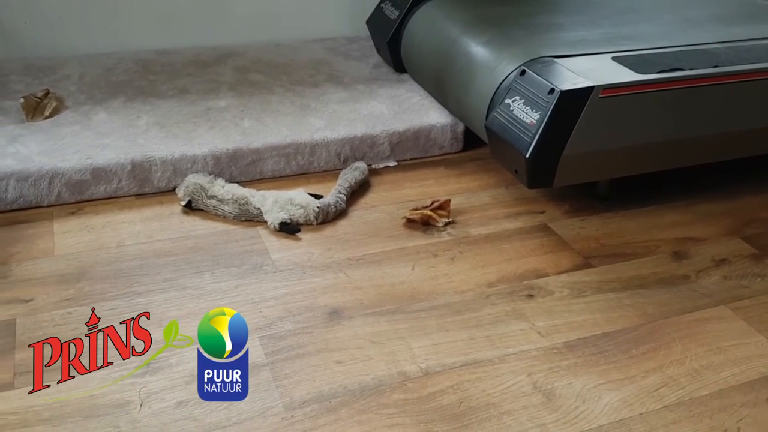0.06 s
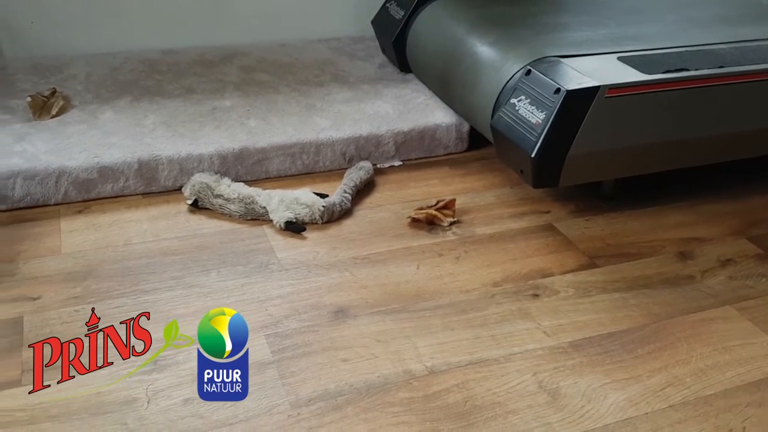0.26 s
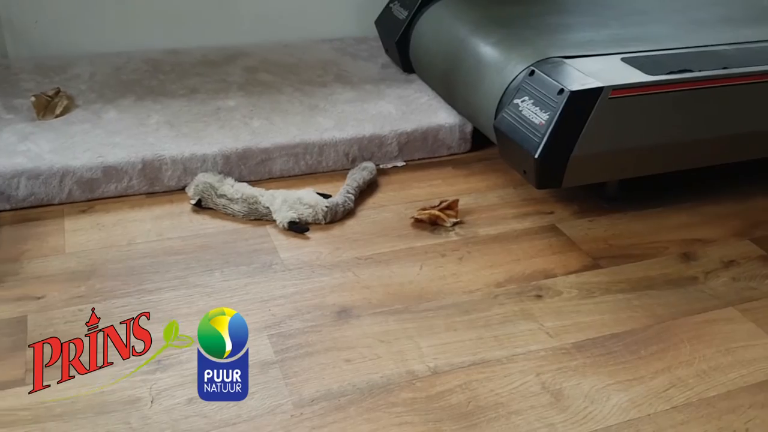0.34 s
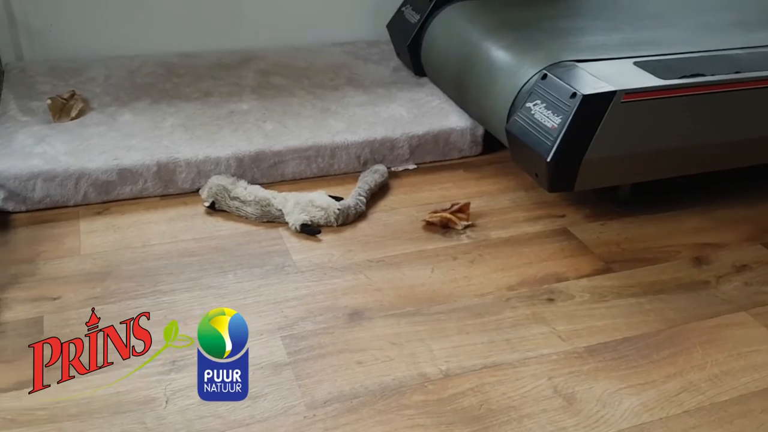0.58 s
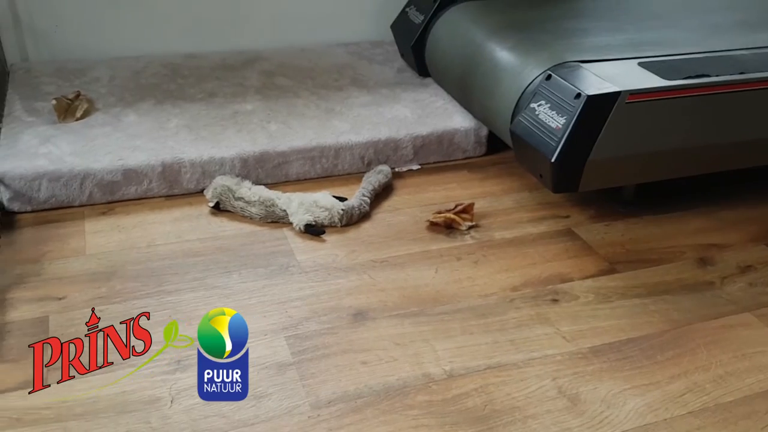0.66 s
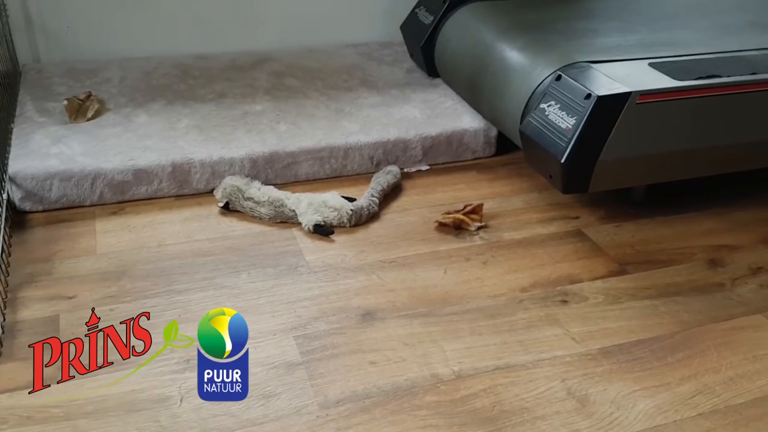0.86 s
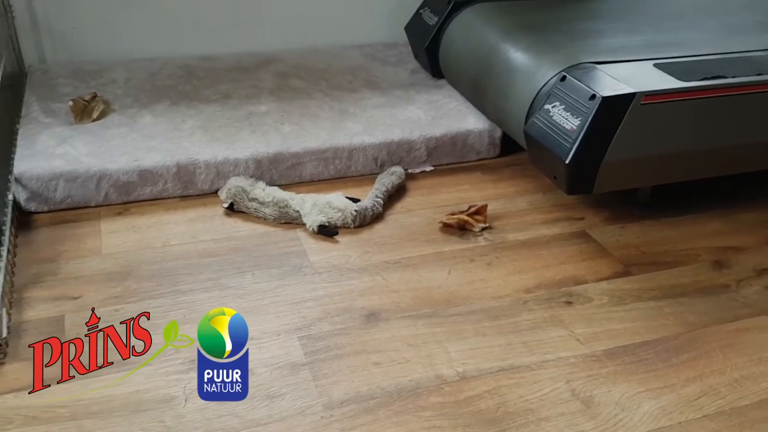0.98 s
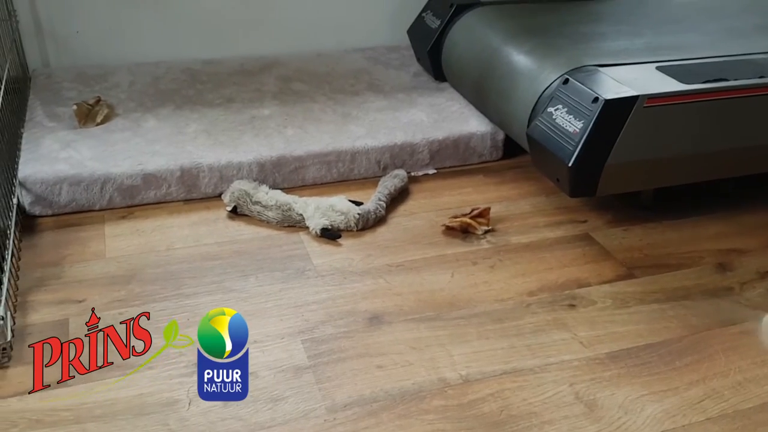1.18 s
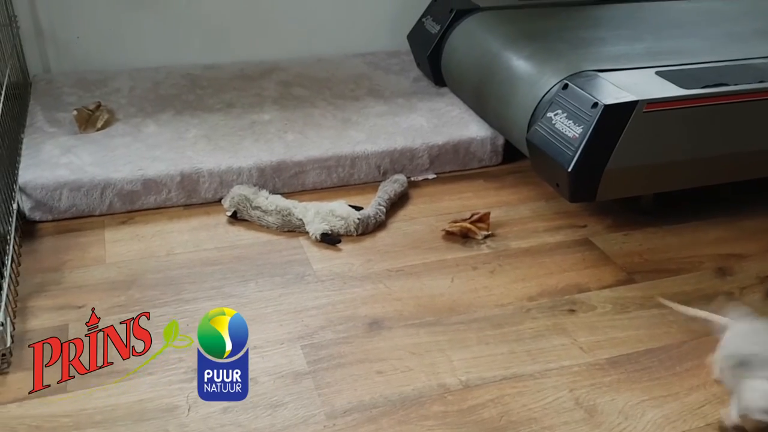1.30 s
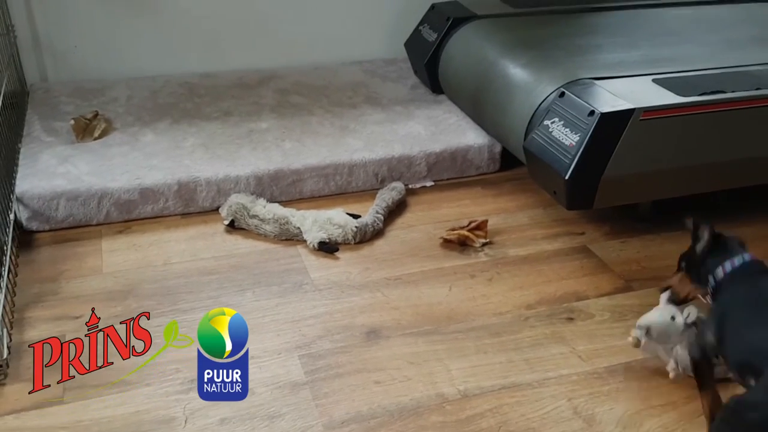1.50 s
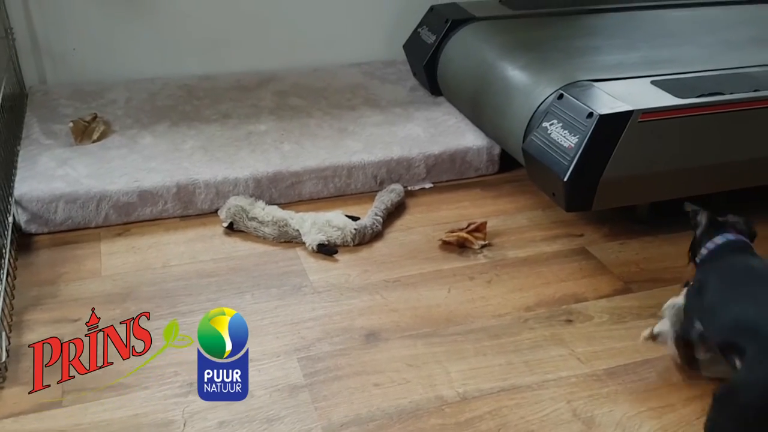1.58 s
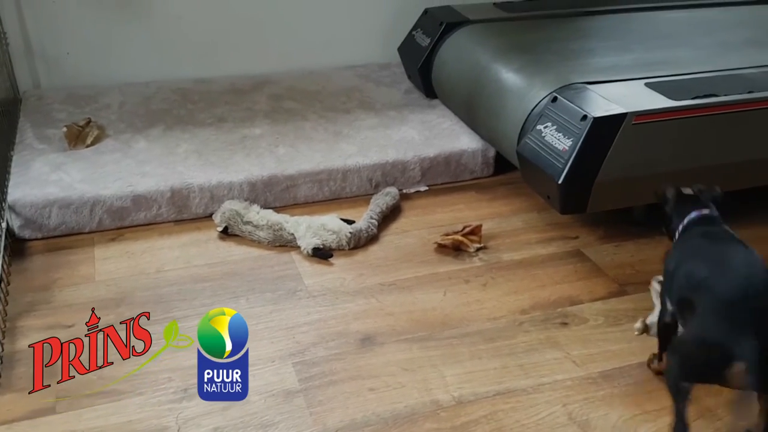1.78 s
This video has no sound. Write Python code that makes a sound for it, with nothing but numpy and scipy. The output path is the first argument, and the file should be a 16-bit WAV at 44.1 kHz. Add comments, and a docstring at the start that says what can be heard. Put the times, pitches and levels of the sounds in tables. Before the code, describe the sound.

A small dog trots over a laminate floor, its claws ticking unevenly with soft paw thumps and short scuffs. Something hard knocks hollowly on the boards, loudest at about 0.45 seconds and again around 0.7. Dull, close taps follow between 0.8 and 1.5 seconds. The steps thin out, with a last faint tick near 1.8. The room rings slightly, over a steady low hum, rumble and hiss.

```python
"""A small dog trots into a room over a laminate floor. Its pads thump the boards; its claws tick,
ring the floor's thin top layer and scuff in short drags. Something hard meets the boards in a few
hollow knocks, and dull taps sound close by. The room rings on after each; rumble, microphone hiss
and a low machine hum stay under it all."""
import sys
import numpy as np
from scipy import signal
from scipy.fft import rfft, irfft, next_fast_len
from scipy.io import wavfile
from scipy.ndimage import uniform_filter1d

SR = 44100
rng = np.random.default_rng(int(sys.argv[2]) if len(sys.argv) > 2 else 0)


def log_audio(samples):
    """Write samples as a 16-bit WAV file to the path given in sys.argv[1]."""
    # one column per channel
    frames = np.atleast_2d(samples).T
    # limit to full scale, then quantise
    limited = np.clip(frames, -1, 1)
    pcm = np.round(limited * 32767).astype(np.int16)
    wavfile.write(sys.argv[1], SR, pcm)


N = 81585
FFT_SIZE = next_fast_len(N + 4096)


def amp(db):
    return 10 ** (np.asarray(db) / 20)


def unit_rms(x):
    return x / np.sqrt(np.mean(x ** 2) + 1e-20)


def unit_peak(x):
    return x / np.abs(x).max()


def curve_at(points, hz):
    freqs_hz, values = np.transpose(points)
    return np.interp(np.log(hz + 1), np.log(freqs_hz + 1), values)


def place(mix, start_s, sound, pan_db):
    """Add a sound to the mix; pan_db is left over right."""
    part = mix[:, round(start_s * SR):][:, :sound.shape[-1]]
    part += amp([[pan_db / 2], [-pan_db / 2]]) * sound[..., :part.shape[1]]


def delay_left(x, lag_s):
    """Delay left against right."""
    shift = np.exp(-1j * np.pi * lag_s * np.fft.rfftfreq(FFT_SIZE, 1 / SR))
    return irfft(rfft(x, FFT_SIZE) * np.array([shift, 1 / shift]), FFT_SIZE)[:, :N]


def resonate(x, hz, width_hz):
    return signal.lfilter(*signal.iirpeak(hz, hz / width_hz, SR), x)


def resonate_twice(x, hz, width_hz):
    return resonate(resonate(x, hz, width_hz), hz, 2 * width_hz)


def treble(x, low_hz=8100, top_hz=11900):
    x = signal.sosfilt(signal.butter(3, low_hz, "high", fs=SR, output="sos"), x)
    return signal.lfilter(*signal.butter(2, top_hz, fs=SR), x)


def ring(modes, t, phases, centre_hz, width_hz):
    """Decaying modes, weighted toward the centre frequency of the blow."""
    out = np.zeros(len(t))
    for (hz, level_db, t60_s), phase in zip(modes, phases):
        weight = 1 / (1 + ((hz - centre_hz) / width_hz) ** 2)
        out += weight * amp(level_db - 60 * t / t60_s) * np.sin(2 * np.pi * hz * t + phase)
    return out


def wander(low_hz, top_hz):
    """Slow random motion, rms 1."""
    t = np.arange(N) / SR
    rates_hz = np.geomspace(low_hz, top_hz, 20)
    return unit_rms(sum(np.sin(2 * np.pi * (hz * t + rng.random())) / np.sqrt(hz) for hz in rates_hz))


# Left-right likeness of the room's sound: freq_hz, correlation
STEREO_CORRELATION = [(60, 0.91), (150, 0.92), (380, 0.87), (950, 0.13), (2380, -0.21), (5980, 0.0046),
                      (15000, -0.2)]


def stereo_noise(shape_db, frames, frame_size):
    """Two partly correlated noises with the given short-time spectrum."""
    hz = np.fft.rfftfreq(frame_size, 1 / SR)
    a, b, c, d = rng.standard_normal((frames, len(hz), 4)).T
    left, independent = a + 1j * b, c + 1j * d
    correlation = curve_at(STEREO_CORRELATION, hz)[:, None]
    right = correlation * left + np.sqrt(1 - correlation ** 2) * independent
    spectra = np.array([left, right]) * amp(shape_db)
    return signal.istft(spectra, nperseg=frame_size, noverlap=frame_size * 3 // 4)[1]


# Background noise spectrum: freq_hz, relative_db
AIR_SPECTRUM = [(12, -37), (20, -30), (104, -7.5), (141, -10.5), (317, -14.5), (345, -20), (483, -18.5),
                (638, -22.5), (776, -24), (1360, -27.5), (1520, -22), (1650, -27.5), (2510, -26),
                (2730, -26.5), (6660, -42), (13400, -40), (15800, -38.5)]


def air(level_db=-58.5, swell_db=0.1):
    """Near-steady room rumble and microphone hiss."""
    shape_db = curve_at(AIR_SPECTRUM, np.fft.rfftfreq(2048, 1 / SR))[:, None]
    noise = stereo_noise(shape_db, frames=N // 512 + 5, frame_size=2048)[:, :N]
    return amp(level_db - swell_db * wander(0.57, 5.45)) * unit_rms(noise)


# Machine tones: pitch_hz, rms_db
HUM_TONES = [(31, -73), (90, -61), (150, -65)]


def hum(waver_db=1.5, drift_hz=1.5):
    """Low tones of a machine, wavering in level and pitch."""
    out = np.zeros(N)
    for pitch_hz, rms_db in HUM_TONES:
        gain = np.sqrt(2) * amp(rms_db + waver_db * wander(3.495, 8.6))
        hz = pitch_hz + drift_hz * wander(1.43, 11.85)
        out += gain * np.sin(2 * np.pi * np.cumsum(hz) / SR)
    return out


# Floor board modes: pitch_hz, level_db, t60_s
BOARD_MODES = [(84.8, -3, 0.12), (137, -26, 0.059), (175, -1, 0.1), (220.6, -0.5, 0.083),
               (365, -2.5, 0.077), (487, 0.5, 0.057)]


def pad_thump(t, centre_hz, rise_s=0.0053):
    """A soft pad sets the boards' low modes ringing."""
    phases = rng.uniform(-0.52, 1, len(BOARD_MODES))
    onset = np.sin(np.pi / 2 * np.minimum(t / rise_s, 1)) ** 2
    return unit_peak(ring(BOARD_MODES, t, phases, centre_hz, width_hz=116) * onset)


def claw_tick(t, noise, pitch_hz, rise_s=0.00066, decay_s=0.0034):
    """A claw lands in a cluster of ticks; the floor's thin top layer rings under it."""
    cluster = noise * np.abs(noise) * np.minimum(t / rise_s, 1) * np.exp(-t / decay_s)
    ticks = 3.0 * (t == 0) + cluster
    body = unit_peak(resonate_twice(ticks, pitch_hz, width_hz=950))
    edge = unit_peak(resonate(resonate(ticks, hz=3000, width_hz=2330), hz=4960, width_hz=3300))
    top_layer = unit_peak(resonate(ticks, hz=2450, width_hz=440))
    return unit_peak(body + amp(-3) * edge + amp(-4) * top_layer)


# Paw falls: start_s, claw_hz, thump_hz, thump_db, board_db, claw_db, scratch_db, pan_db
PAW_FALLS = [(.035, 3060, 202, -66, -58, -51.5, -57, -4), (0.164, 2780, 300, -59, -56.5, -50.5, -65, -5),
             (.234, 2350, 197, -50.5, -51, -39, -54, 1.5), (.241, 2420, 202, -64, -52, -40, -55, -7),
             (.351, 2360, 178, -44.5, -72, -68, -70, 2), (.362, 3360, 185, -48, -40.5, -36.5, -51.5, -0.5),
             (.37, 2450, 202, -47, -44.5, -38, -71, -3), (0.455, 2540, 151, -46, -50, -37.5, -44.5, -0.5),
             (0.498, 2600, 91, -45.5, -52, -74, -71, -1), (0.61, 2247, 91, -51.5, -49.5, -44, -51, 0),
             (.665, 2000, 198, -64, -44.5, -49, -52, 2), (.709, 5750, 338, -37.5, -37, -41.5, -45.5, -0.5),
             (0.711, 2170, 101, -45, -54, -38, -40, -2.5), (.863, 2270, 200, -54.5, -41, -38.5, -52, -2.5),
             (0.922, 2640, 222, -47, -38, -34.5, -42.5, -0.5), (.99, 2780, 203, -61, -72, -51, -57.5, 12),
             (1.106, 2560, 197.5, -81.5, -105, -46, -56.5, 1),
             (1.139, 2280, 200, -50, -59, -39.5, -58, -0.5), (1.263, 2450, 90, -54, -59, -50.5, -48, -3.5),
             (1.276, 3100, 201, -60, -53, -38.5, -52.5, -0.5),
             (1.417, 3960, 200, -64.5, -52.5, -39.5, -48, -0.5),
             (1.425, 2380, 252, -68, -53, -43.5, -55.5, 3), (1.498, 2850, 300, -57, -49.5, -43, -53.5, 1.5),
             (1.537, 2660, 214, -57, -48, -47, -60, 0), (1.793, 4040, 200, -64.5, -79, -54.5, -64, -5)]


def paws(board_decay_s=0.0035, scratch_rise_s=0.00245, scratch_decay_s=0.0031):
    """Each fall: a pad thump, a dull tap of the board, claw ticks and a bright scratch."""
    out, t = np.zeros((2, N)), np.arange(4096) / SR
    board_envelope = np.exp(-t / board_decay_s)
    scratch_envelope = np.minimum(t / scratch_rise_s, 1) * np.exp(-t / scratch_decay_s)
    for start_s, claw_hz, thump_hz, thump_db, board_db, claw_db, scratch_db, pan_db in PAW_FALLS:
        board_noise, claw_noise, *scratch_noise = rng.standard_normal((4, len(t)))
        thump = amp(thump_db) * pad_thump(t, thump_hz)
        board = resonate_twice(board_noise * board_envelope, hz=650, width_hz=1330)
        claw = amp(claw_db) * claw_tick(t, claw_noise, claw_hz)
        scratch = amp(scratch_db) * unit_peak(treble(scratch_noise * scratch_envelope))
        place(out, start_s, thump + amp(board_db) * unit_peak(board) + claw + scratch, pan_db)
    return out


# Claw drags: start_s, length_s, level_db, pitch_hz, relative_hiss_db
CLAW_DRAGS = [(0.263, 0.097, -61, 2530, -2), (0.393, 0.08, -58, 2760, -22), (0.489, 0.16, -53.5, 1200, -13),
              (0.656, .06, -57, 1340, -7.5), (0.721, 0.062, -58.5, 2130, -27),
              (0.922, 0.052, -62.5, 2760, -3.5), (1.276, 0.023, -50.5, 1800, -32),
              (1.426, 0.045, -61.5, 3240, -21), (1.503, 0.11, -66.5, 2600, 0)]


def claw_drags(clicks_per_s=1400, spread_db=2):
    """A dragging claw: dense uneven clicks through its resonance, with hiss above."""
    out, t = np.zeros((2, N)), np.arange(8192) / SR
    for start_s, length_s, level_db, pitch_hz, hiss_db in CLAW_DRAGS:
        hits = rng.random(len(t)) < clicks_per_s / SR
        click_db = spread_db * np.minimum(rng.exponential(1, len(t)), 4)
        noise = rng.standard_normal((2, len(t)))
        clicks = hits * np.sign(noise[0]) * amp(click_db)
        rasp = unit_rms(resonate_twice(clicks, pitch_hz, width_hz=1150))
        hiss = amp(hiss_db) * unit_rms(treble(noise))
        stroke = np.sin(np.pi * np.minimum(t / length_s, 1) ** 0.37)
        place(out, start_s, amp(level_db) * stroke * (rasp + hiss), pan_db=-2.5)
    return out


# Hollow body modes: pitch_hz, level_db, t60_s
HOLLOW_MODES = [(366, -4.5, 0.051), (533, -1.5, 0.047), (696.4, 2, 0.036), (974, -5.5, 0.034),
                (1079, -1, 0.039), (1200.4, 0, 0.033), (1288, -4, 0.04), (1560, 5, 0.022), (1873, 2, .025)]
# Blows to the body: start_s, level_db, centre_hz, width_hz
HOLLOW_KNOCKS = [(.453, -21.5, 1200, 850), (0.517, -61, 1600, 403), (.544, -36.5, 1180, 404),
                 (.693, -32.5, 1070, 198), (.705, -29, 1070, 198), (.71, -33, 1090, 410),
                 (0.776, -45.5, 980, 594)]


def hollow_knocks(rise_s=0.00225):
    """A hollow body struck: its modes start quickly and die fast."""
    out, t = np.zeros((2, N)), np.arange(4096) / SR
    for start_s, level_db, centre_hz, width_hz in HOLLOW_KNOCKS:
        phases = rng.uniform(-0.81, 0.87, len(HOLLOW_MODES))
        body = ring(HOLLOW_MODES, t, phases, centre_hz, width_hz) * np.minimum(t / rise_s, 1)
        place(out, start_s, amp(level_db) * unit_peak(body), pan_db=-0.8)
    return out


# Dull taps close by: start_s, level_db, pitch_hz, tick_db
CLOSE_TAPS = [(0.848, -43, 392, -65), (1.017, -53, 1010, -73), (1.147, -47, 940, -56),
              (1.209, -39, 465, -41.5), (1.5, -52, 446, -65)]


def close_taps(tick_decay_s=0.00071):
    """One push through a wide resonance, with a fine tick on top."""
    out, t = np.zeros((2, N)), np.arange(1024) / SR
    for start_s, level_db, pitch_hz, tick_db in CLOSE_TAPS:
        push = unit_peak(resonate_twice(1.0 * (t == 0), pitch_hz, width_hz=370))
        tick = unit_peak(treble(rng.standard_normal((2, len(t))) * np.exp(-t / tick_decay_s)))
        place(out, start_s, amp(level_db) * push + amp(tick_db) * tick, pan_db=-0.6)
    return out


# Reverberation times: freq_hz, t60_s
ROOM_DECAY = [(150, 0.57), (600, 0.54), (1700, 0.63), (4500, 0.54), (12000, 0.53)]


def room(x, early_db=2, early_t60_s=0.13, gap_s=0.0018, turns_per_s=3.31):
    """Early echoes and a smooth tail; three random responses crossfade so no fixed tones ring."""
    out, frame_s = np.zeros((2, N)), np.arange(400) * 64 / SR
    t60_s = curve_at(ROOM_DECAY, np.fft.rfftfreq(256, 1 / SR))[:, None]
    late = amp(-60 * frame_s / t60_s)
    early = amp(early_db - 60 * frame_s / early_t60_s)
    shape_db = 20 * np.log10(late + early + 1e-9)
    for turn in range(3):
        response = stereo_noise(shape_db, frames=len(frame_s), frame_size=256)
        response *= np.clip(np.arange(response.shape[1]) / SR / gap_s - 1, 0, 1)
        response /= np.linalg.norm(response[0])
        share = np.sqrt(2 / 3) * np.cos(np.pi * (turns_per_s * np.arange(N) / SR + turn / 3))
        out += signal.fftconvolve(x * share, response, axes=1)[:, :N]
    return out


def scene():
    """Feet, knocks and taps feed the room, the close taps least; air and hum lie underneath."""
    feet = delay_left(paws() + claw_drags(), lag_s=-0.000049)
    knocks = delay_left(hollow_knocks(), lag_s=0.00012)
    taps = close_taps()
    room_send = amp(3) * feet + amp(-1.5) * knocks + amp(-7) * taps
    return feet + knocks + taps + room(room_send) + air() + hum()


# Microphone pair balance: freq_hz, left_over_right_db
MIC_BALANCE = [(60, 0.5), (200, -1.4), (380, -1), (700, 1.5), (1290, -1), (2380, -2.5), (4400, 0.5),
               (8120, 1.5), (15000, 1.5)]


def record(dry, cutoff_hz=15910):
    """Two microphones of slightly unlike colour, then a low-pass."""
    left_gain = amp(curve_at(MIC_BALANCE, np.fft.rfftfreq(FFT_SIZE, 1 / SR)) / 2)
    heard = irfft(rfft(dry, FFT_SIZE) * np.array([left_gain, 1 / left_gain]), FFT_SIZE)[:, :N]
    lowpass = signal.firwin(1023, cutoff_hz, window=("kaiser", 9), fs=SR)
    return signal.oaconvolve(heard, lowpass[None], "same")


dry = scene()
out = record(dry)
log_audio(out)
```